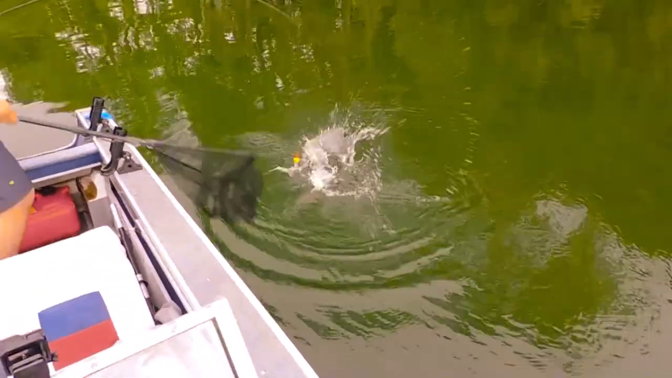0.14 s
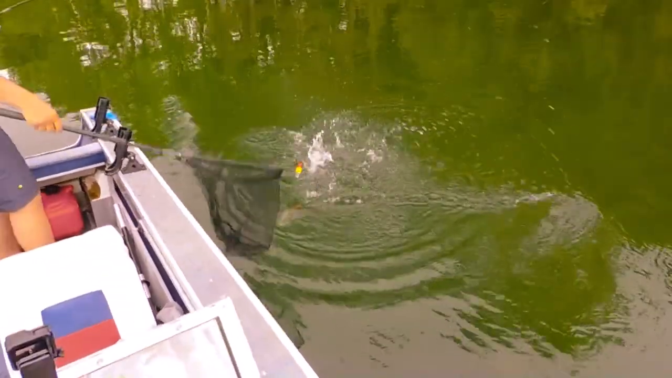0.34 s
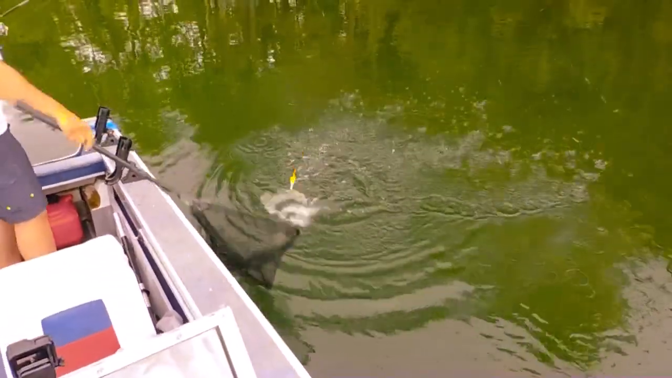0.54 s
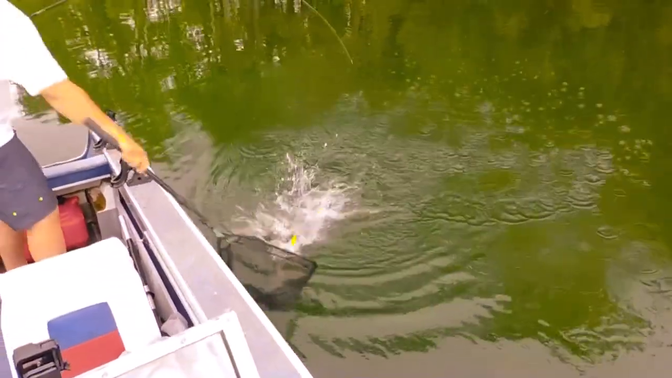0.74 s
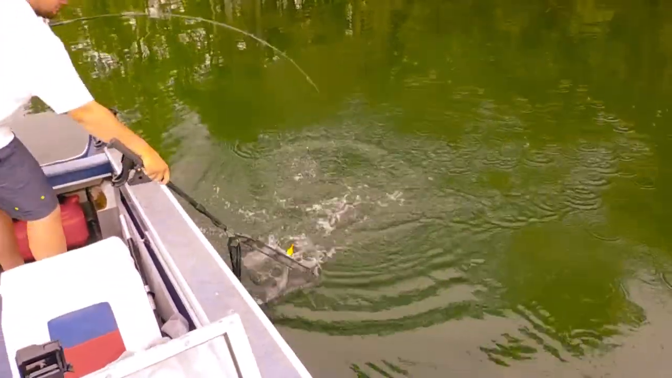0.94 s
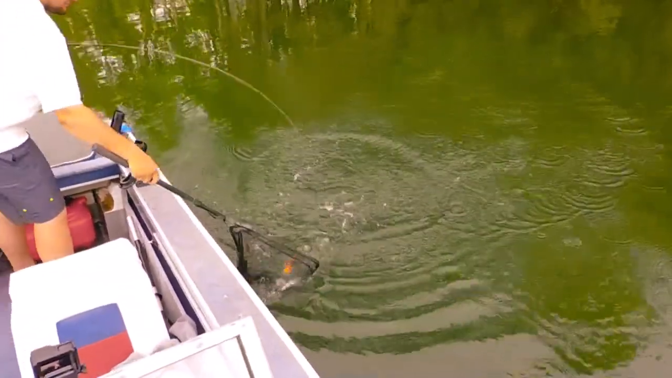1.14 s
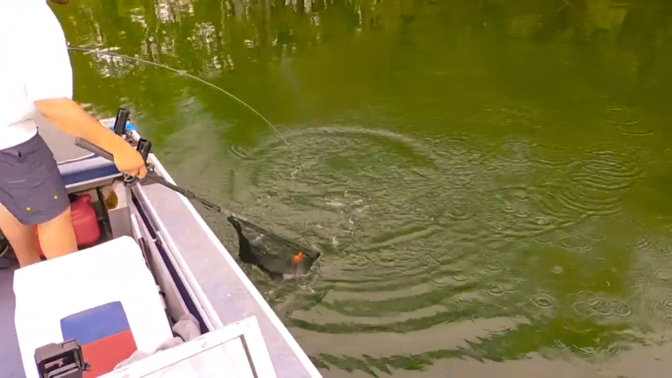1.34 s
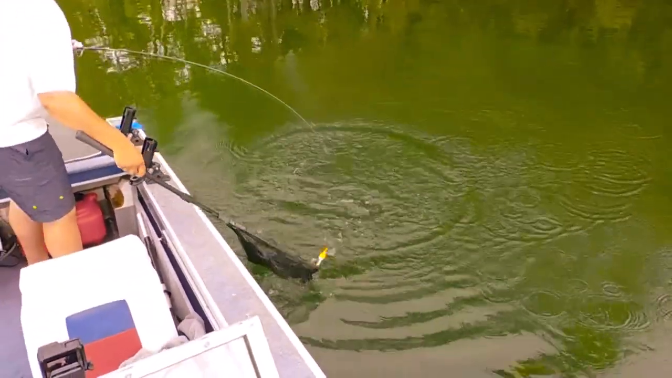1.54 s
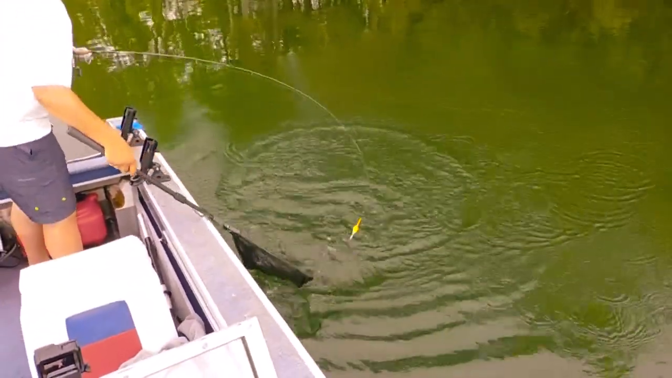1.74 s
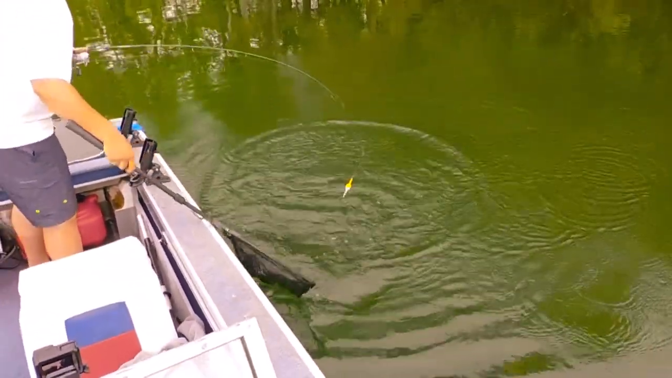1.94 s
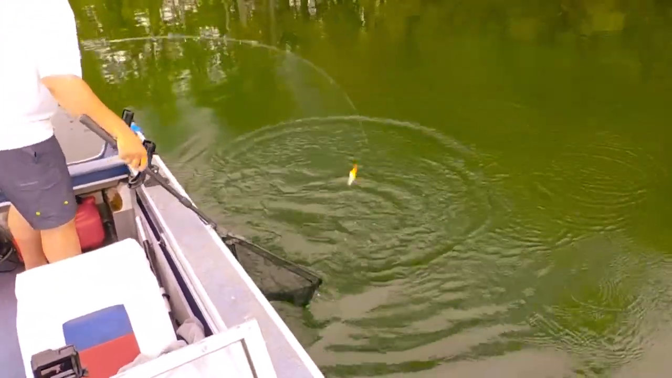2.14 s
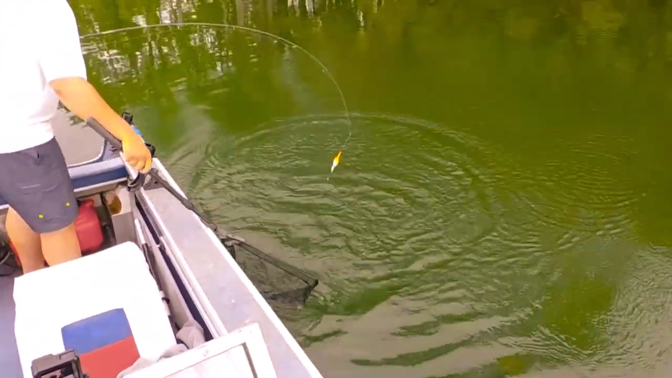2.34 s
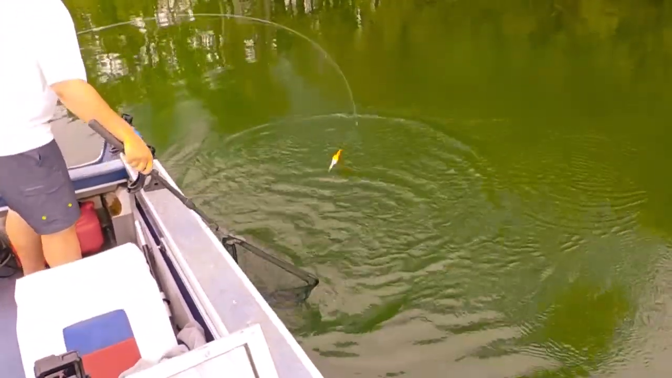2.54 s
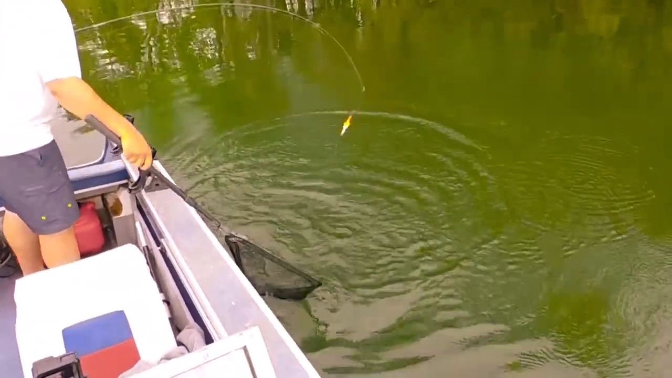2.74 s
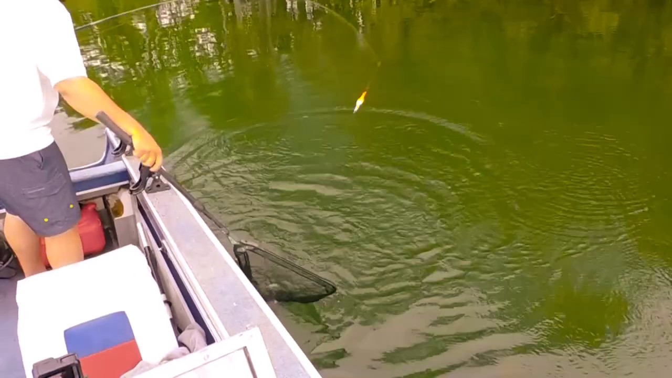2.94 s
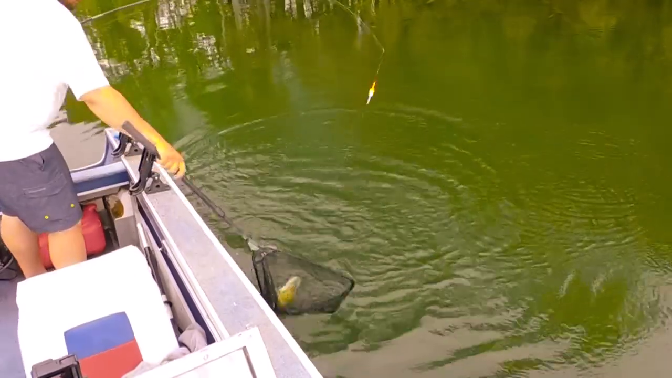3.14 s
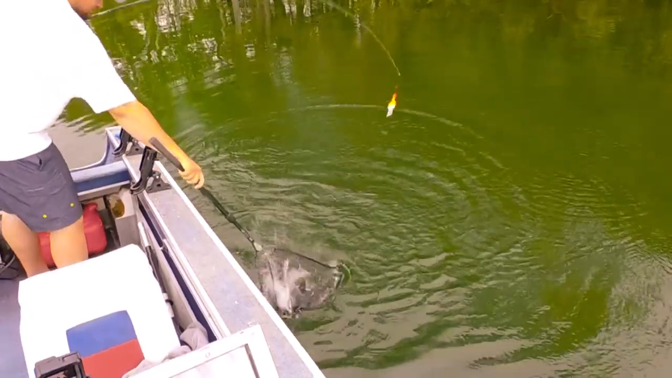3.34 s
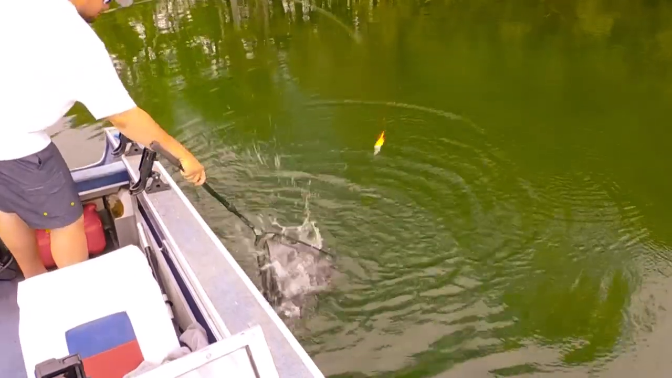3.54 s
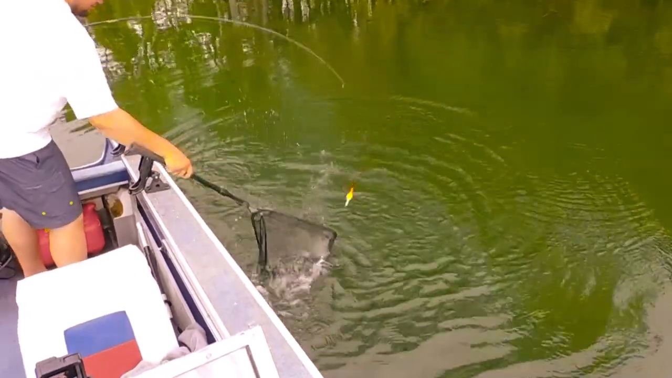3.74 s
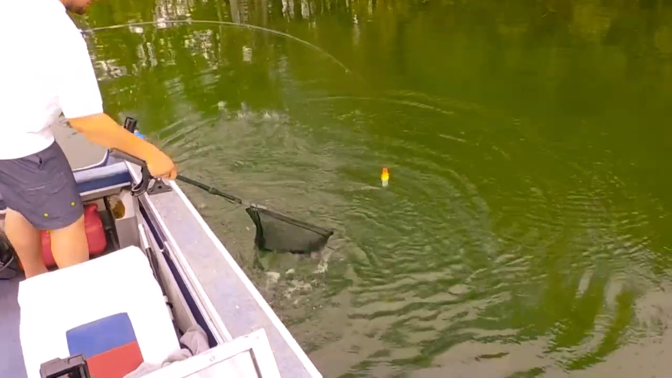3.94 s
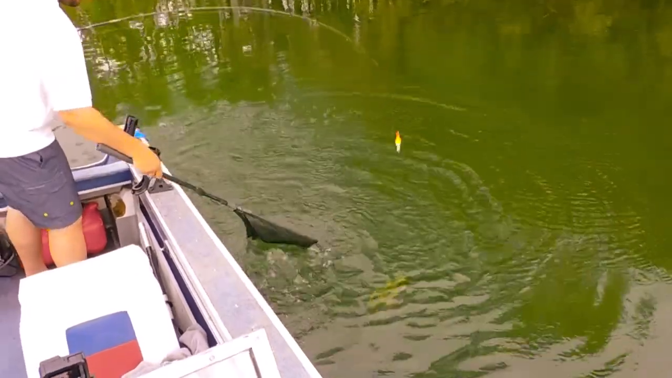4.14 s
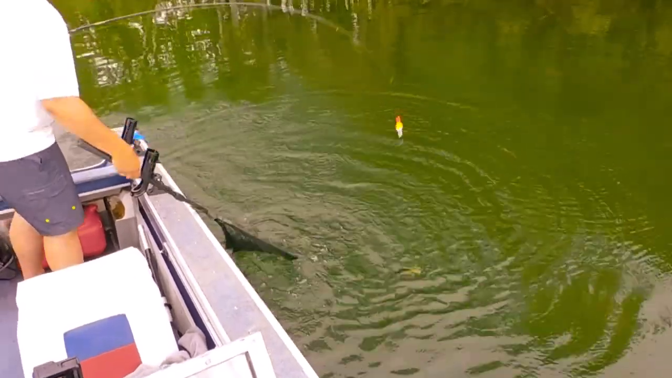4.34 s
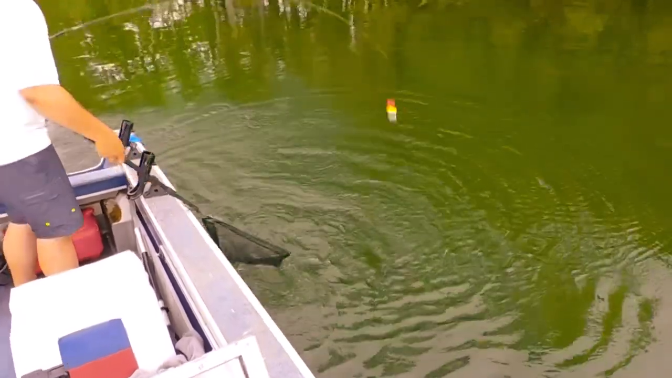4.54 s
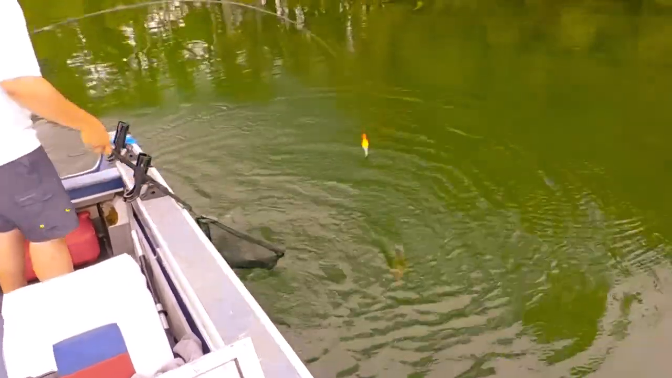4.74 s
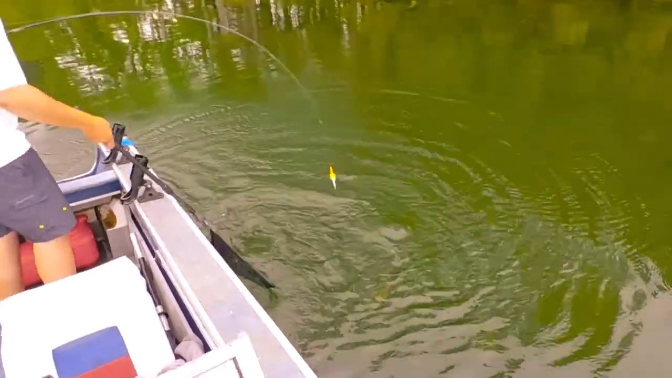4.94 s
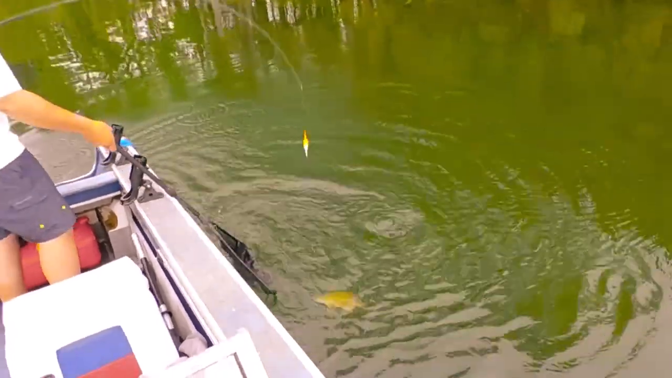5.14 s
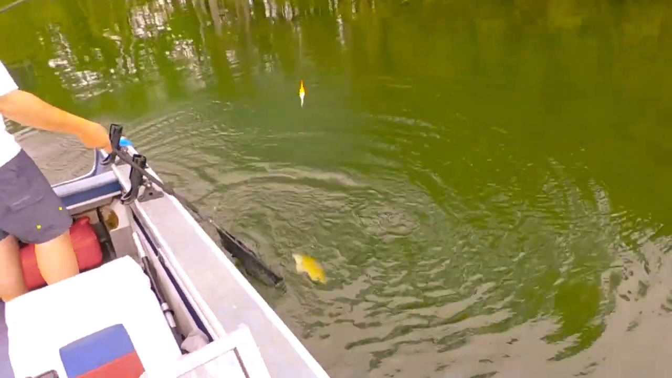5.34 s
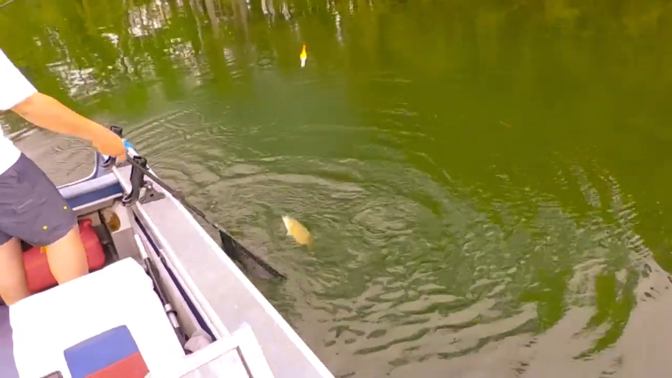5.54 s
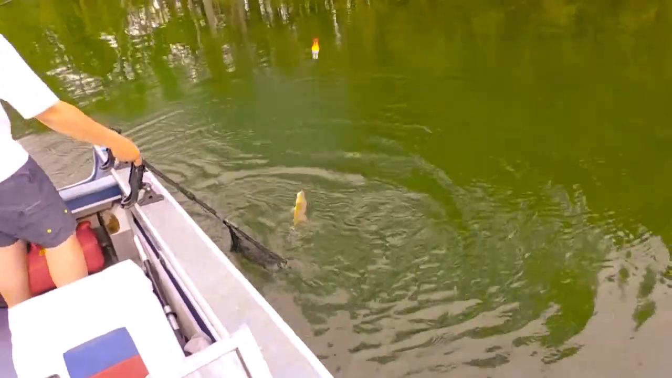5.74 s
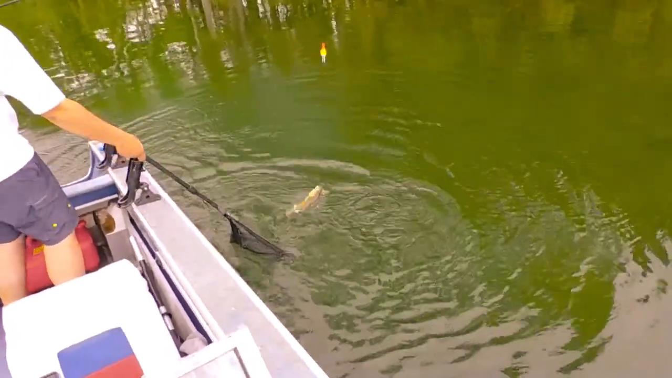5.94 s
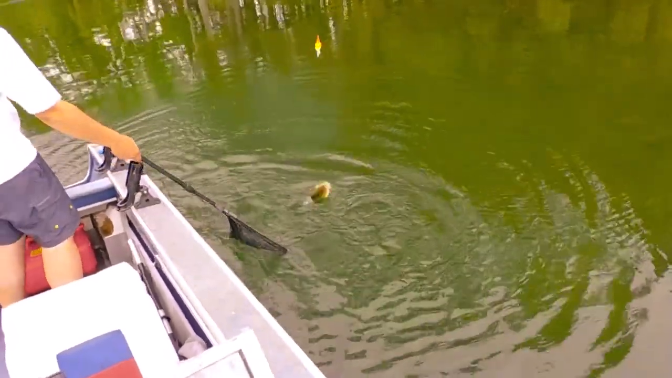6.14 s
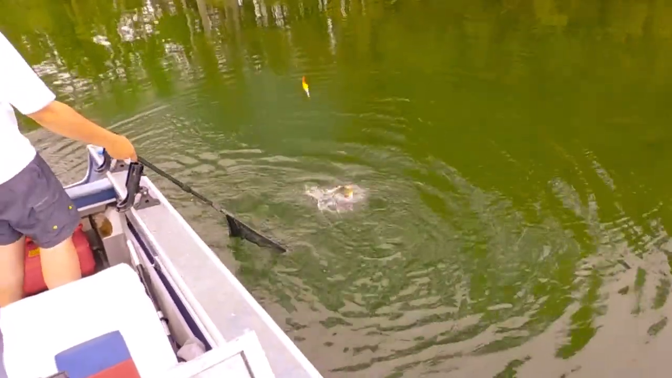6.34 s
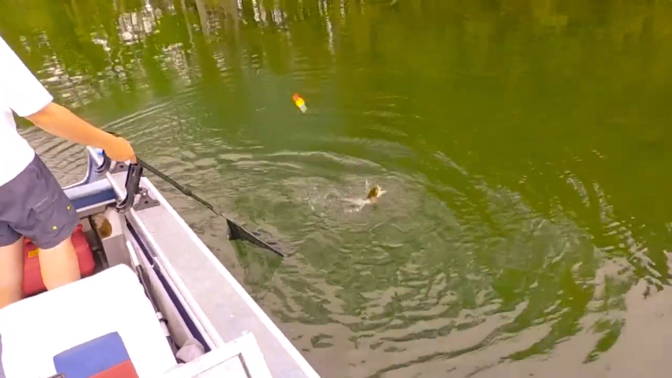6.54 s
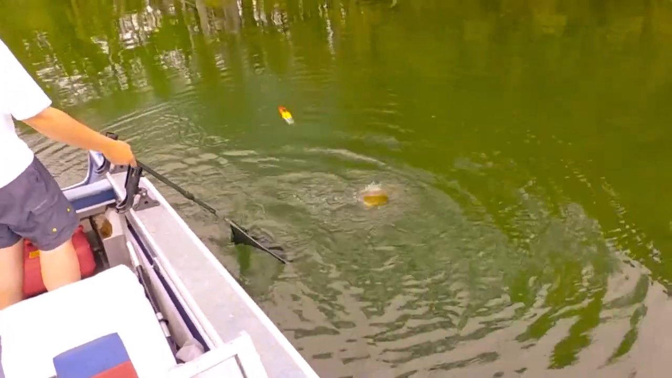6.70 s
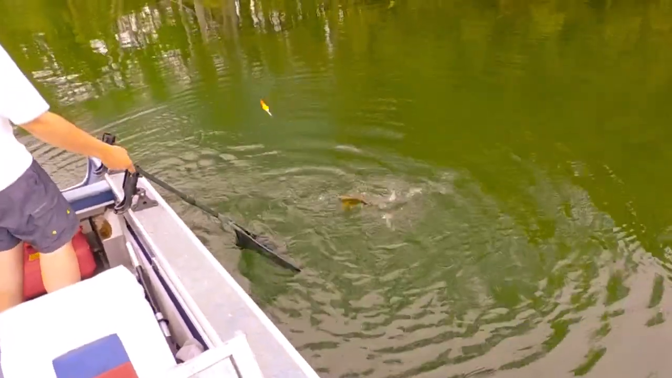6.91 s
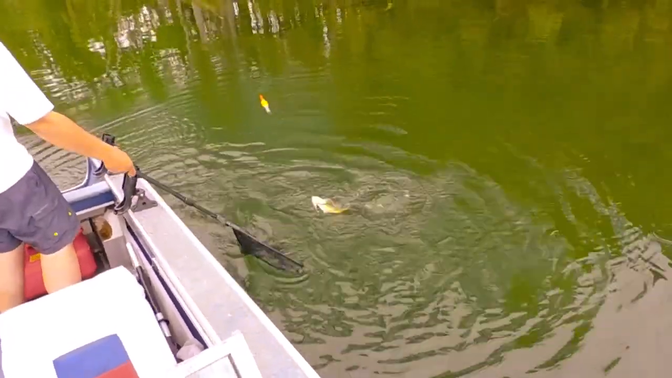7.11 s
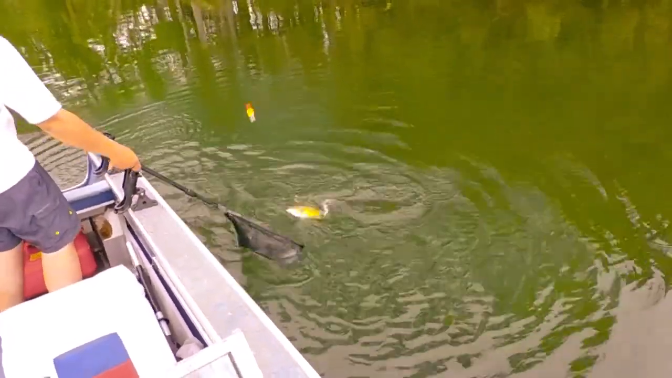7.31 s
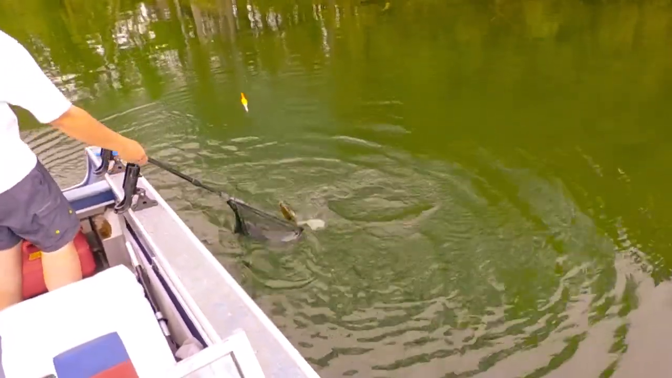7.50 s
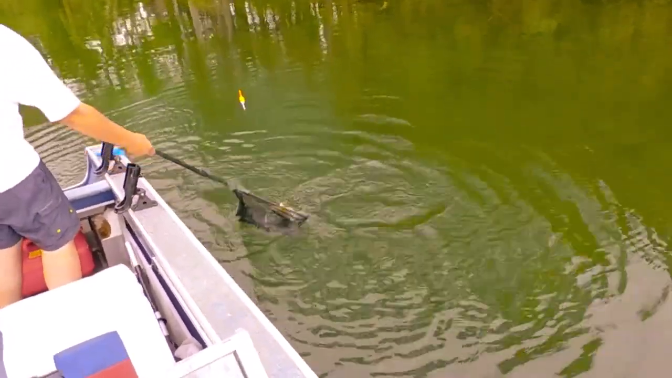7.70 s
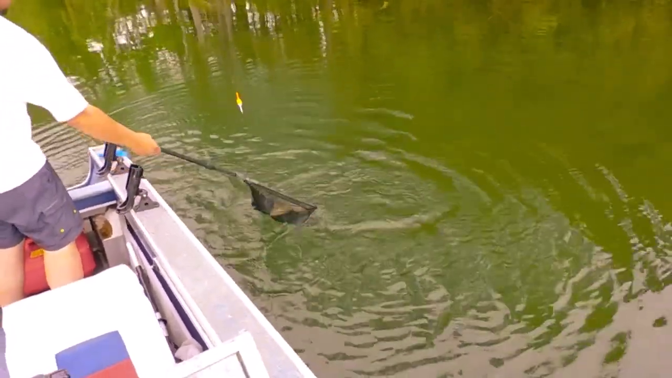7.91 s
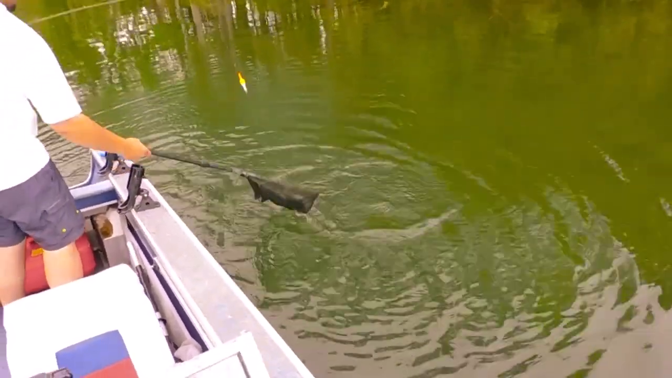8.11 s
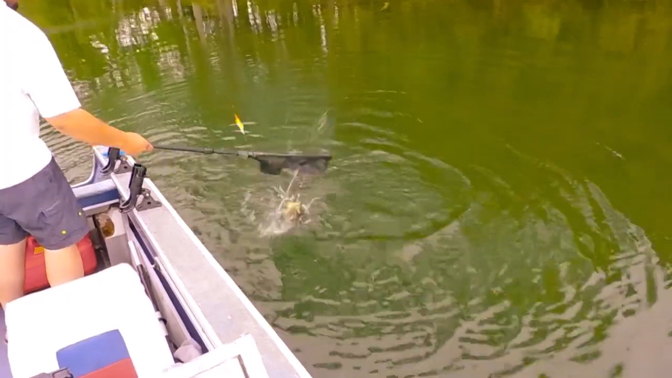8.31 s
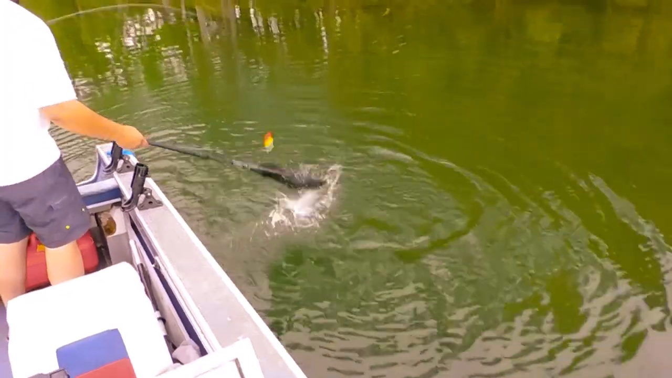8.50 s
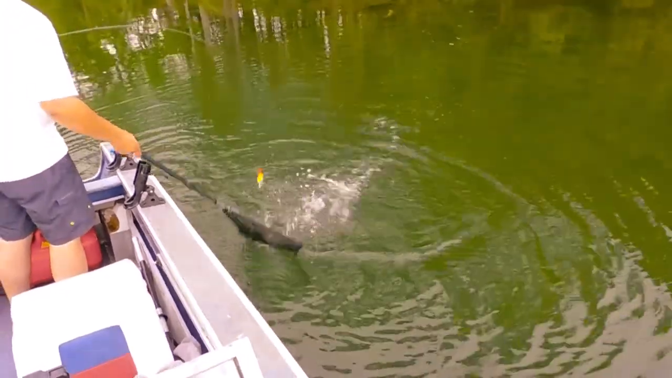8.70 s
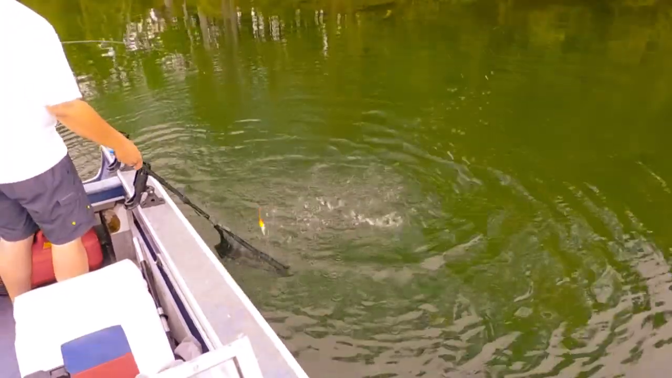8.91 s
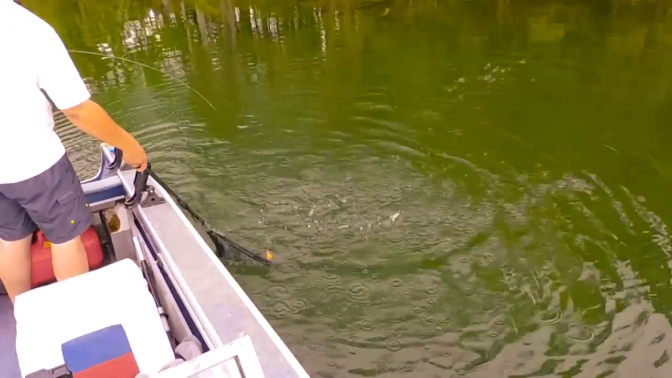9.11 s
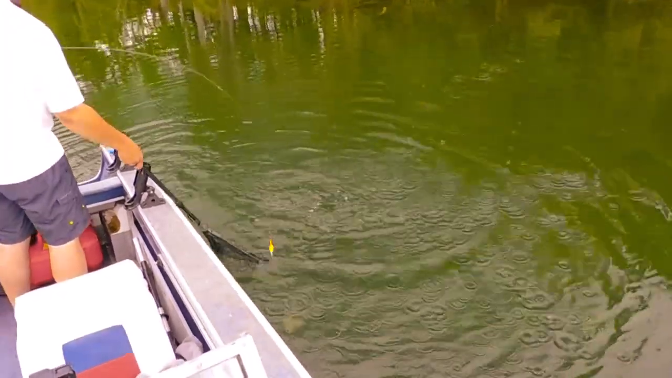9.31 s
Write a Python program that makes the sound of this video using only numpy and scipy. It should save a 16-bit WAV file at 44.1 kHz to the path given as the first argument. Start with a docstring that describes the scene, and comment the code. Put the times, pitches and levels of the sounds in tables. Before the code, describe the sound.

Close beside a small metal boat on a calm lake, a fish thrashes hard, with foamy splashes and popping air pockets. The water settles to trickling, with light taps and dull hull knocks. Another splash burst follows, then a metallic clink and faint bird whistles, smaller swirls, and a last sharp splash that dies away. A faint electric motor hum, low wind rumble and soft hiss continue underneath. Close, dry, open-air stereo pickup.

```python
"""On a calm lake, beside a small metal boat, a hooked fish thrashes: foam, spray and ringing air pockets.
Water is clumped noise and swarms of bubbles; each pocket is a gliding, dying sine with a short noisy slap.
Drops, tackle and hull are short bursts of noise that ring resonances; one small metal part clinks.
A small electric motor hums in sines over a rough throb, and a far bird whistles with echoes.
Slow shaped noise gives the wind rumble and distant drone, over a steady hiss.
"""
import sys
import numpy as np
from scipy import signal
from scipy.fft import rfft, irfft, next_fast_len
from scipy.io import wavfile
from scipy.ndimage import map_coordinates

SR = 44100
rng = np.random.default_rng(int(sys.argv[2]) if len(sys.argv) > 2 else 0)


def unload_audio(sound):
    """Save the sound as a 16-bit wav file, at the path given as the first command line argument."""
    columns = np.transpose(np.atleast_2d(sound))
    # keep every value between -1 and 1, then stretch to whole-number steps
    steps = np.round(np.clip(columns, -1, 1) * 32767)
    wavfile.write(sys.argv[1], SR, steps.astype(np.int16))


N = 412776  # samples, about 9.36 s

# Levels of near sounds are set before NEAR_COLOUR and the side scatter act on them.
# strokes of fish and net that churn the water, levels before the foam, wash and spray mix:
# (peak time [s], slosh level [dB], spray level [dB], time to fall 60 dB [s])
STROKES = [(0.0, -30.5, -41.5, 0.25), (0.151, -42, -57, 0.51), (0.27, -48.5, -61, 2.2),
           (0.58, -49.5, -60, 1.2), (0.65, -42, -53, 2.4), (0.846, -36.5, -55, 0.56),
           (0.928, -45.5, -54.5, 0.53), (3.014, -50, -68, 0.73), (3.21, -50.5, -65, 1.9),
           (3.369, -40, -50, 0.9), (3.44, -39, -60, 0.53), (3.73, -55.5, -66, 0.36), (3.8, -60, -63, 1.3),
           (5.75, -59, -70, 0.56), (6.32, -51.5, -62.5, 0.97), (6.43, -50, -60.5, 0.14),
           (6.53, -56.5, -69, 0.4), (6.62, -53, -64, 0.55), (6.88, -50, -57.5, 0.51),
           (7.56, -57.5, -76, 1.3), (8.17, -57.5, -62.5, 0.37), (8.22, -64, -62, 0.77),
           (8.322, -39.5, -48, 0.17), (8.4, -46, -53, 0.35), (8.46, -46.5, -53.5, 0.35),
           (8.51, -43.5, -63, 0.21), (8.6, -47, -65, 1.45), (8.73, -55, -48.5, 0.16), (8.82, -53, -57, 1.1)]
# noise colour of the wash and of the spray: (frequency [Hz], relative level [dB per Hz])
WASH_COLOUR = [(90, -47), (150, -12.5), (450, -6.5), (900, -7.5), (1500, -5.5), (3300, -15), (6000, -27),
               (16000, -68)]
SPRAY_COLOUR = [(1180, -43), (2000, -7), (2740, -3.5), (3490, -6.5), (3940, -6.5), (7910, -13),
                (15100, -20), (16000, -47)]
# air pockets closing in the water, plus a few tonal drop impacts that ring near 2.7-2.9 kHz, # all before their
# flutter: # (time [s], level [dB], start pitch [Hz], time to fall 60 dB [ms], glide [multiple of the speeds
# below])
AIR_POCKETS = [(0.015, -13, 2410, 5.4, 1.5), (0.029, -31, 945, 29, 2.5), (0.047, -29.5, 1206, 40, 0.2),
               (0.095, -26, 1000, 13, -5), (0.142, -28.5, 947, 42, 0.5), (0.154, -26, 475, 51, 0),
               (0.244, -37, 1153, 48, -0.5), (0.294, -31, 1060, 29, 3), (0.457, -33.5, 1130, 20, 0),
               (0.466, -38.5, 1140, 33, 2), (0.575, -29, 1220, 55, 1), (0.603, -28, 2000, 8.3, -1.5),
               (0.611, -31.5, 1105, 20, -1), (0.663, -31.5, 534, 18, -1.5), (0.686, -28, 1290, 19, 2),
               (0.718, -34, 1210, 36, 1.5), (0.775, -21.5, 507, 24.6, 3.5), (0.797, -35, 492, 59, 0.5),
               (0.849, -20.5, 1280, 18.5, 7), (0.894, -38, 310, 65, 0.1), (0.908, -31, 1364, 21, 1.5),
               (0.926, -30, 1180, 11, -2), (1.029, -41, 625, 31.5, 1), (1.176, -39, 637, 70, 0.5),
               (1.177, -44.5, 415, 95, -0.5), (1.209, -40, 1320, 36, -1.1), (2.993, -42, 796, 70, -1),
               (3.003, -32, 1410, 12, -0.5), (3.017, -32, 840, 6, 5), (3.038, -38.5, 406, 19, 1),
               (3.197, -35.5, 1140, 18, 1.5), (3.264, -43, 1050, 26, -1), (3.306, -38, 1580, 20, 6.5),
               (3.341, -35, 290, 24, 0), (3.38, -18.5, 790, 13, 4.5), (3.429, -27, 1000, 19, 1),
               (3.496, -26.5, 1146, 17, 1), (3.535, -42.5, 391, 104, 0.5), (3.575, -39, 670, 64, 2),
               (3.671, -42, 350, 62, 0.6), (3.72, -37.5, 686, 42, 1.5), (3.794, -34, 1550, 7.7, 0),
               (4.168, -51.5, 1340, 54, 3), (4.279, -51, 860, 62, 2), (4.771, -55, 976, 63, 2.5),
               (4.995, -48, 917, 71, 0.5), (5.695, -46, 1600, 26, 1.5), (5.883, -42.5, 980, 39, 1.3),
               (6.174, -37.5, 877, 47, 4), (6.189, -39.5, 1400, 91, 0.5), (6.235, -35, 890, 32, 6.5),
               (6.265, -33, 1760, 31, 1.2), (6.285, -37.5, 1335, 48, 1.1), (6.312, -52, 806, 60, 9),
               (6.331, -43, 1330, 33, 1.5), (6.374, -40, 507, 76, -0.4), (6.415, -42.5, 1040, 68, 2),
               (6.616, -40, 1740, 17, -1), (6.792, -36.5, 2670, 5.4, -2), (6.815, -41, 2280, 28, 2.5),
               (6.857, -39.5, 1096, 54, -0.1), (6.9, -42.5, 1030, 45, 2.5), (7.215, -31, 2710, 10, 1),
               (7.226, -48.5, 1184, 70, 4), (7.257, -38, 2900, 8.6, 0), (7.337, -41.5, 705, 133, 0.85),
               (7.372, -42.5, 1300, 16, 0), (7.53, -37.5, 825, 14, 1), (7.563, -31.5, 1540, 8, -2),
               (7.576, -43, 2470, 19, 2), (7.876, -40.5, 1160, 11, -1), (8.151, -41, 1270, 34, 1),
               (8.199, -25.5, 1470, 17, 1), (8.226, -22, 1340, 8.9, 0), (8.246, -30, 1900, 8.8, 4),
               (8.288, -31, 1350, 14, 1), (8.303, -32, 1180, 22, -1), (8.311, -25, 1110, 16, 1),
               (8.383, -10.5, 1420, 7.8, 3), (8.385, -24.5, 580, 26, 1.7), (8.408, -33, 1135, 34, 1.5),
               (8.488, -36.5, 482, 48, 0.5), (8.511, -40, 866, 56, 0.7), (8.568, -33.5, 1170, 17, 1),
               (8.601, -35, 1360, 25, 2.5), (8.636, -42, 1450, 54, 1.5), (8.709, -38, 2370, 14, -2),
               (8.738, -43, 2650, 18, 1.5), (8.758, -38, 1106, 37, 2), (8.8038, -37.5, 2700, 9.9, 0),
               (8.823, -38, 2780, 12, 0), (8.876, -39, 2590, 10, 1), (8.893, -39, 1620, 18, -1),
               (8.9397, -35.5, 2720, 13, 0.5), (8.97, -37.5, 1160, 11, 4), (9.005, -45, 1150, 50, 13.5),
               (9.111, -44, 1145, 39, 0.3)]
# sharp drop impacts: (time [s], body peak [dB], bright edge against body before a 4 dB lift [dB])
DROP_TICKS = [(0.572, -29.5, -26), (0.58, -25.5, -30), (0.644, -36, -28), (0.664, -26.5, -17),
              (0.683, -32, -30), (0.892, -30, -29), (2.949, -43, -17), (3.195, -35, -29),
              (3.241, -35.5, -21), (3.441, -30, -32), (3.5734, -35.5, -24), (3.6108, -37, -27.5),
              (3.776, -40, -20), (3.795, -38, -14), (4.216, -34.5, -17), (4.231, -34.5, -15),
              (4.3645, -29.5, -7.5), (5.9186, -44.5, -31), (6.2082, -36, -7.5), (6.2666, -29.5, -40),
              (6.3756, -34, -39), (6.477, -34.5, -16), (6.727, -44, -13), (6.743, -40, -11),
              (7.256, -39, -32), (7.562, -38, -46), (8.202, -33, -32), (8.227, -26.5, -18.5),
              (8.289, -30, -28), (8.451, -27.5, -18), (8.568, -35, -35), (8.704, -29.5, -30),
              (8.7226, -40, -25), (8.876, -38, -17), (8.942, -36, -9.5)]
# hard taps of tackle on the boat: (time [s], peak level [dB])
TACKLE_TAPS = [(1.1757, -34.5), (1.7657, -40), (2.0958, -39), (2.4157, -39.5), (4.413, -36.5), (4.427, -43),
               (4.709, -39), (5.1494, -49.5)]
# what a tap rings: (frequency [Hz], width [Hz], level [dB])
TACKLE_MODES = [(1850, 980, -0.5), (3000, 860, 2), (3810, 580, 0.5)]
# knocks on the hull: (time [s], low panel peak [dB], side plate peak [dB], rail peak [dB])
KNOCKS = [(1.594, -40, -38.5, -45.5), (1.761, -40, -38.5, -33.5), (1.857, -44.5, -38.5, -45.5),
          (2.168, -51.5, -46, -73), (3.234, -46, -48.5, -60), (4.214, -74, -72, -37),
          (4.231, -75, -73, -42.5), (4.364, -31, -34, -30.5), (4.587, -39.5, -40, -48),
          (4.639, -51, -45.5, -59), (4.692, -46.5, -65, -52), (4.861, -43, -46.5, -53),
          (8.219, -47, -42, -37), (9.193, -49, -45.5, -45.5), (9.272, -47, -39, -65)]
# resonances of low panels, side plates and stiff rail: (frequency [Hz], width [Hz], level [dB])
PANEL_MODES = [(60.7, 13, 2), (207, 44, 1), (136, 54, 0.5)]
PLATE_MODES = [(290, 110, 0), (352, 240, 1), (406, 177, 2.5)]
RAIL_MODES = [(530, 115, 1), (803, 210, 5.5), (1170, 310, 3), (2130, 760, -2.5)]
# motor shaft tones, the throb first; load and wobble change the others: (frequency [Hz], rms level [dB])
MOTOR_TONES = [(59.2, -66), (525, -79), (641.5, -73.5), (700, -81), (758, -81)]
# load on the motor, added to every tone but the throb: (time [s], level [dB])
MOTOR_LOAD = [(0, 3), (1.5, 9), (2.5, 3.5), (3.5, 2), (4.1, 5), (5.3, 1.5), (6.2, 0), (7.2, 2.5),
              (9.36, 4.5)]
# far bird, an opening trill and then slurs, before flutter and echoes:
# (time [s], length [s], start pitch [Hz], end pitch [Hz], level [dB])
BIRD_NOTES = [(4.425 + .084 * k, .04, 3900, 5300, -74) for k in range(6)] + [ (4.91, .05, 3900, 4400, -73),
              (5.155, .04, 4200, 4700, -75), (5.215, .065, 6400, 4500, -74), (5.31, .05, 4500, 3600, -72),
              (5.355, .06, 3900, 5100, -74), (5.375, .065, 2900, 3600, -75), (5.48, .03, 4600, 3700, -74),
              (5.51, .04, 4200, 5100, -74), (5.61, .13, 6000, 2700, -73)]
# wind rumble, before its slow wobble: (time [s], level [dB])
GUSTS = [(0.0, -61.5), (1.67, -62), (4.01, -68), (4.56, -63), (5.19, -69.5), (9.36, -65)]
# noise colour of the rumble and of the distant lake and hull drone: (frequency [Hz], level [dB per Hz])
RUMBLE_COLOUR = [(12, -32), (20, 5.5), (70, 4), (92, -8), (123, -16), (250, -14), (320, -9.5), (550, -120)]
DRONE_COLOUR = [(71, -12), (120, -8), (423, -6), (703, -4), (788, -9.5), (913, -4), (1760, -17),
                (1940, -16.5), (2320, -24), (6000, -41), (7800, -59), (13200, -120)]
# noise colour of the hiss: (frequency [Hz], relative level [dB])
HISS_COLOUR = [(500, -0.5), (3000, -3.5), (16000, -4.0)]
# left-right likeness before the right side's difference is doubled: (frequency [Hz], likeness [0 to 1])
LIKENESS = [(30, 0.96), (100, 0.84), (1500, 0.75), (4000, 0.25), (12000, 0.42)]
# tone colour of all near sounds: (frequency [Hz], gain [dB])
NEAR_COLOUR = [(2300, -0.5), (3100, -0.5), (3400, -4), (9000, -4.5)]
# strength of the scatter that differs from side to side: (frequency [Hz], gain [dB])
SCATTER_COLOUR = [(100, -36), (1200, -28.0), (2500, -9.5), (5000, -11.0), (12000, -11)]

SWELL_DB_PER_S = 183  # how fast a stroke builds
SETTLE_DB, SETTLE_T60 = -19, 1.5  # ripples after a stroke: level against it [dB], time to fall 60 dB [s]
CALM_SLOSH_DB, CALM_SPRAY_DB = -69, -78  # lapping that never stops
# the wash swings wider than the foam, so a fading stroke breaks into single bubbles
WASH_GROWS, WASH_AT_DB = 0.23, -44.5  # extra dB per dB of slosh, slosh level with no extra [dB]
FOAM_SCATTER_DB, FOAM_CYCLES = 4, 13  # spread of loudness, base life in cycles of the pitch
HOLD = 1.35  # a bubble holds its ring, then dies quickly (1 = even decay)
RISE_OCT_PER_S, SINK_OCT_PER_S = 15, 12  # glide speed of a pocket for a glide of 1 up or down
# brood around a pocket: base level against it [dB], spread in time [s], half the widest pitch shift [octaves]
BROOD_DB, BROOD_S, BROOD_OCTAVES = -10.5, 0.04, 0.587
TICK_HZ = 2440  # where a drop impact rings
KNOCK_T60 = 0.24  # s, base length of the rattling push
CLINK_S, CLINK_DB, CLINK_HZ, CLINK_T60 = 4.3645, -30, 6140, 0.0076  # s, dB, Hz, s
TOP_HZ = 15850  # upper limit of the whole sound


def amp(db):
    """Turns a level in dB into a gain."""
    return 10 ** (np.asarray(db) / 20)


def unit(x):
    """Scales a sound to rms 1."""
    return x / np.sqrt(np.mean(x ** 2) + 1e-20)


def peak_one(x):
    """Scales each row to a peak of 1."""
    return x / np.abs(x).max(axis=1, keepdims=True)


def columns(table):
    """Gives each column of a table upright, one row per event."""
    return [column[:, None] for column in np.transpose(table)]


def along(points, hz):
    """Joins (frequency, value) points by straight lines on a log frequency axis."""
    f, values = np.transpose(points)
    return np.interp(np.log(hz + 1), np.log(f + 1), values)


def curves(rows):
    """Gives one value per sample for each column after the time."""
    s, *values = np.transpose(rows)
    return [np.interp(np.arange(N) / SR, s, column) for column in values]


def wobble(rate):
    """Draws a smooth random curve with rate knots a second."""
    knots = rng.standard_normal(int(N * rate / SR) + 4)
    return map_coordinates(knots, [np.arange(N) * rate / SR])


def filtered(x, response):
    """Multiplies the spectrum of x by a response of frequency."""
    size = next_fast_len(N + SR // 2)
    hz = np.fft.rfftfreq(size, 1 / SR)
    return irfft(rfft(x, size) * response(hz), size)[..., :N]


def coloured(x, spectrum):
    """Shapes x by (frequency, dB) points and scales it to rms 1."""
    return unit(filtered(x, lambda hz: amp(along(spectrum, hz))))


def modes(table):
    """Adds up resonances with alternating sign, as a response of frequency."""
    def response(f):
        total = 0
        for k, (centre, width, db) in enumerate(table):
            ring = 1j * f * width / (centre * centre - f * f + 1j * f * width)
            total = total + (-1) ** k * amp(db) * ring
        return total
    return response


def placed(s, shapes):
    """Adds up one row of samples per event, each starting at its time."""
    at = np.round(np.asarray(s) * SR).astype(int)[:, None] + np.arange(shapes.shape[1])
    return np.bincount(at.ravel(), shapes.ravel(), N + shapes.shape[1] + SR)[:N]


def bubbles(s, db, hz, t60, rise, attack, size):
    """Rings damped sines that glide (octaves per s) for a third of t60, with an attack in s."""
    t = np.arange(size) / SR
    db, hz, t60, rise = (np.asarray(v, float)[:, None] for v in (db, hz, t60, rise))
    pitch = np.minimum(hz * 2 ** (rise * np.minimum(t, t60 / 3)), SR / 3)
    swell = (1 - np.exp(-(t / attack) ** 2)) * amp(db - 60 * (t / t60) ** HOLD)
    # a bubble bursts once its pitch has climbed this far
    swell = swell * np.clip(4 * (2.6 - pitch / hz), 0, 1)
    return placed(s, swell * np.sin(2 * np.pi * np.cumsum(pitch, axis=1) / SR))


def background():
    """Plays wind rumble and a distant drone, partly shared by both sides, and a separate hiss on each."""
    def turn(hz):
        return np.arccos(np.clip(along(LIKENESS, hz), -1, 1)) / 2

    def spread(pair):
        middle_and_difference = filtered(pair, lambda hz: [np.cos(turn(hz)), np.sin(turn(hz))])
        return np.array([[1, 1.0], [1, -2.0]]) @ middle_and_difference

    pairs = rng.standard_normal((2, 2, N))
    rumble = amp(curves(GUSTS)[0] + 0.88 * wobble(1.6)) * coloured(spread(pairs[0]), RUMBLE_COLOUR)
    drone = amp(-62.5 + 2.8 * wobble(3.656)) * coloured(spread(pairs[1]), DRONE_COLOUR)
    hiss = amp(-73.5) * coloured(rng.standard_normal((2, N)), HISS_COLOUR)
    return rumble + drone + hiss


def motor():
    """Hums in shaft tones that share one unsteady speed; each swells alone, over a rough low throb."""
    turn = 2 * np.pi * np.cumsum(1 + 0.002897 * wobble(1.5)) / SR
    whine = 0
    for hz, db in MOTOR_TONES[1:]:
        level = np.sqrt(2) * amp(db + 1.3 * wobble(4.2))
        whine = whine + level * np.sin(hz * turn + 7 * rng.random())
    hz, db = MOTOR_TONES[0]
    throb = unit(filtered(rng.standard_normal(N), modes([(hz, 7, 0)])))
    return amp(curves(MOTOR_LOAD)[0]) * whine + amp(db) * throb


def churn():
    """Gives slosh and spray in dB: strokes build, die away and leave ripples, adding as power."""
    t = np.arange(0, N + 64, 64) / SR
    s, slosh_db, spray_db, t60 = columns(STROKES)
    after = np.maximum(t - s, 0)
    build = amp(SWELL_DB_PER_S * np.minimum(t - s, 0)) ** 2
    fall = amp(-60 * after / t60) ** 2
    ripples = amp(SETTLE_DB - 60 * after / SETTLE_T60) ** 2
    shape = build * (fall + ripples)

    def level(db, calm_db):
        return 10 * np.log10((amp(db) ** 2 * shape).sum(axis=0) + amp(calm_db) ** 2)

    return curves(np.transpose([t, level(slosh_db, CALM_SLOSH_DB), level(spray_db, CALM_SPRAY_DB)]))


def sheets(rate, t60, scatter_db, steady):
    """Gives the gain of water sheets landing at random: a sudden rise and quick fall on a steady share."""
    hits = (rng.random(N) < rate / SR) * amp(scatter_db * rng.standard_normal(N))
    t = np.arange(SR // 10) / SR
    splash = (1 - np.exp(-t / 0.0029)) * amp(-60 * t / t60)
    return unit(steady + signal.fftconvolve(hits, splash)[:N])


def swarm(count, centre_hz, octaves, cycles, scatter_db, size):
    """Scatters small bubbles with random pitch, life and loudness; rms 1."""
    when, life = rng.random((2, count))
    hz = np.clip(centre_hz * 2 ** (octaves * rng.standard_normal(count)), 200, 14000)
    t60 = np.minimum(cycles * (0.54 + 2 * life) / hz, size / SR)
    db = scatter_db * rng.standard_normal(count)
    return unit(bubbles(when * N / SR, db, hz, t60, 0.4 / t60, 0.096 * t60[:, None], size))


def foam_and_spray():
    """Foam, wash and spray follow the churning, in clumps as sheets of water fall."""
    slosh_db, spray_db = churn()
    clump = sheets(45, 0.12, 2.66, steady=0.22)
    spit = sheets(70, 0.022, 6.3, steady=0.75)
    foam = swarm(count=9000, centre_hz=1150, octaves=0.622, cycles=FOAM_CYCLES,
                 scatter_db=FOAM_SCATTER_DB, size=600)
    wash = coloured(rng.standard_normal(N), WASH_COLOUR)
    patter = swarm(count=8000, centre_hz=3500, octaves=0.76, cycles=5.2, scatter_db=3.5, size=130)
    fizz = coloured(rng.standard_normal(N) * 1.15 + patter, SPRAY_COLOUR)
    wash_gain = amp(-5.5 + WASH_GROWS * (slosh_db - WASH_AT_DB))
    slosh = amp(slosh_db) * (amp(-2.5) * np.sqrt(clump) * foam + wash_gain * clump * wash)
    return slosh + amp(spray_db) * np.sqrt(clump) * spit * fizz


def brood(s, db, hz, count=7):
    """Each pocket breaks up into a few quieter bubbles that ring just after it starts."""
    late, size, pitch = np.moveaxis(rng.random((len(s), count, 3)), 2, 0)
    middle_hz = np.sqrt(hz * 1300)[:, None]
    small_hz = (middle_hz * 2 ** (BROOD_OCTAVES * 2 * (2 * pitch - 1))).ravel()
    t60 = FOAM_CYCLES / small_hz
    when = (s[:, None] + BROOD_S * late).ravel()
    small_db = (db[:, None] + BROOD_DB * (1 + size)).ravel()
    return bubbles(when, small_db, small_hz, t60, .5 / t60, t60[:, None] / 10, size=1500)


def slaps(s, db):
    """Each pocket closes with a short, broad burst of noise."""
    t = np.arange(1500) / SR
    fall = amp(db[:, None] - 60 * t / 0.042) * np.minimum(t / 0.0011, 1)
    bursts = placed(s, fall * rng.standard_normal((len(s), len(t))))
    return filtered(bursts, lambda f: modes([(900, 2200, 0)])(f) ** 2 / (1 + 1j * f / 5000))


def air_pockets():
    """Trapped air, and a few tonal drops, ring at a gliding pitch, with a brood of bubbles and a slap."""
    s, db, hz, t60_ms, glide = np.transpose(AIR_POCKETS)
    rise = glide * np.where(glide > 0, RISE_OCT_PER_S, SINK_OCT_PER_S)
    # the pocket wall is ragged, so its ring flutters
    flutter = amp(3 * wobble(350) - 1)
    rings = bubbles(s, db, hz, t60_ms / 1000, rise, 0.00058, size=4400) * flutter
    return rings + brood(s, db, hz) + amp(-3.5) * slaps(s, db)


def drop_ticks():
    """A click and a millisecond burst with a faint tail ring briefly, with a bright edge."""
    s, db, edge_db = columns(DROP_TICKS)
    t = np.arange(2048) / SR
    f = np.fft.rfftfreq(len(t), 1 / SR)
    tail = amp(-18 - 60 * t / .06)
    shape = t / 0.0072 * np.exp(1 - t / 0.00075) + tail
    # the constant 2.5 is the click
    burst = 2.5 + rfft(shape * rng.standard_normal((len(s), len(t))))
    body = irfft(burst * modes([(TICK_HZ, .8 * TICK_HZ, 0)])(f) / (1 + 1j * f / (2.48 * TICK_HZ)) ** 4)
    edge = irfft(burst * modes([(9000, 8000, 0)])(f) ** 2)
    return placed(s[:, 0] - .0005, amp(db) * (peak_one(body) + amp(edge_db + 4.0) * peak_one(edge)))


def tackle_taps():
    """A click and a short rattle ring the tackle, softened in the top octaves."""
    s, db = columns(TACKLE_TAPS)
    t = np.arange(2048) / SR
    f = np.fft.rfftfreq(len(t), 1 / SR)
    rattle = 0.21 * amp(-60 * t / 0.021) * rng.standard_normal((len(s), len(t)))
    ring = irfft((1 + rfft(rattle)) * modes(TACKLE_MODES)(f) / (1 + 1j * f / 6000) ** 2)
    return placed(s[:, 0], amp(db) * peak_one(ring))


def hull_knocks():
    """Net handle and feet give a rattling push that rings the panels, plates and rail."""
    s, panel_db, plate_db, rail_db = columns(KNOCKS)
    t = np.arange(SR // 4) / SR
    f = np.fft.rfftfreq(len(t), 1 / SR)
    # (resonances, peak [dB], share of the push length, contact softness [Hz])
    parts = [(PANEL_MODES, panel_db, 1.1, 400), (PLATE_MODES, plate_db, .7, 700),
             (RAIL_MODES, rail_db, .4, 3500)]
    out = 0
    for part, db, share, soft_hz in parts:
        push = amp(-60 * t / (share * KNOCK_T60)) * rng.standard_normal((len(s), len(t)))
        # a yielding contact passes little above soft_hz
        ring = irfft(rfft(push) * modes(part)(f) / (1 + 1j * f / soft_hz) ** 2, len(t))
        out = out + amp(db) * peak_one(ring)
    return placed(s[:, 0], out)


def clink():
    """A small metal part, struck by a hard knock, rings as one short steady sine."""
    return bubbles([CLINK_S], [CLINK_DB], [CLINK_HZ], [CLINK_T60], [0], 0.00014, size=2000)


def bird():
    """Whistles glide from pitch to pitch, blurred by echoes from the shore made of dying noise."""
    s, length, start_hz, end_hz, db = columns(BIRD_NOTES)
    u = np.minimum(np.arange(SR // 6) / SR / length, 1)  # 0 to 1 through each note
    pitch = start_hz * (end_hz / start_hz) ** u
    swell = amp(db) * np.sqrt(np.abs(np.sin(np.pi * u)))
    notes = swell * np.sin(2 * np.pi * np.cumsum(pitch, axis=1) / SR)
    direct = placed(s[:, 0], notes) * amp(5.3 * wobble(40))
    t = np.arange(SR // 4) / SR
    echoes = amp(-60 * t / .35) * rng.standard_normal((2, len(t)))
    echoes = echoes / np.linalg.norm(echoes[0])
    return .3 * direct + signal.fftconvolve(direct[None], echoes, axes=1)[:, :N]


def scene():
    """Near sounds reach both sides almost alike, plus a short scatter off the boat of opposite sign."""
    near = foam_and_spray() + air_pockets() + drop_ticks() + tackle_taps() + hull_knocks() + clink()
    near = filtered(near, lambda hz: amp(along(NEAR_COLOUR, hz)))
    t = np.arange(SR // 16) / SR
    scatter = amp(-60 * t / 0.0095) * rng.standard_normal(len(t))
    side = signal.fftconvolve(near, scatter / np.linalg.norm(scatter))[:N]
    side = filtered(side, lambda hz: amp(along(SCATTER_COLOUR, hz)))
    both = near * amp([[-.2], [.2]]) + side * np.array([[1], [-1]])
    return both + motor() + bird() + background()


def record(dry):
    """Keeps nothing at or above the band limit."""
    return filtered(dry, lambda hz: hz < TOP_HZ)


dry = scene()
out = record(dry)
unload_audio(out)
```